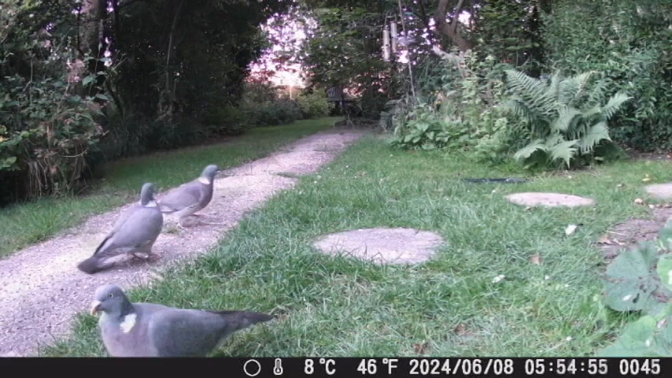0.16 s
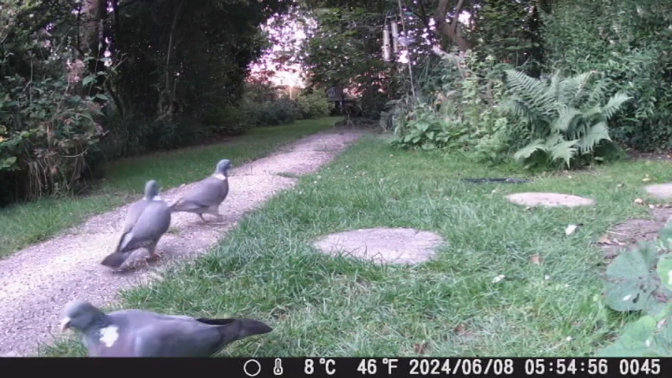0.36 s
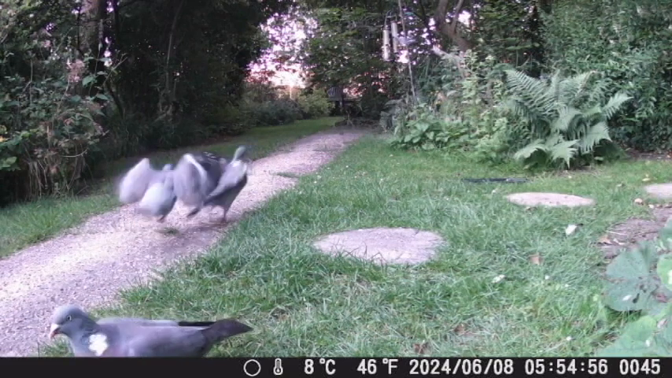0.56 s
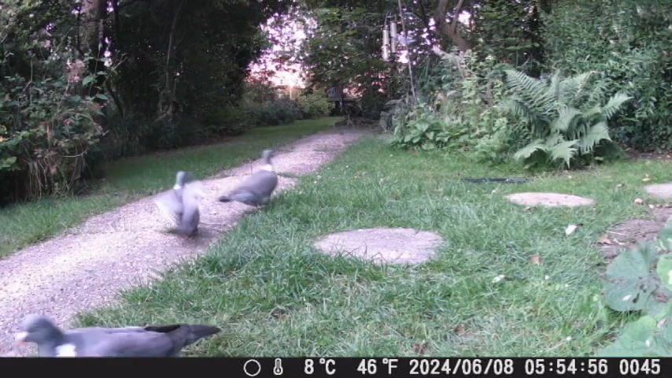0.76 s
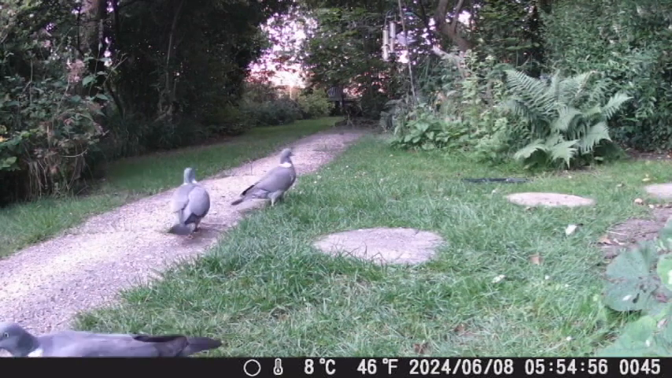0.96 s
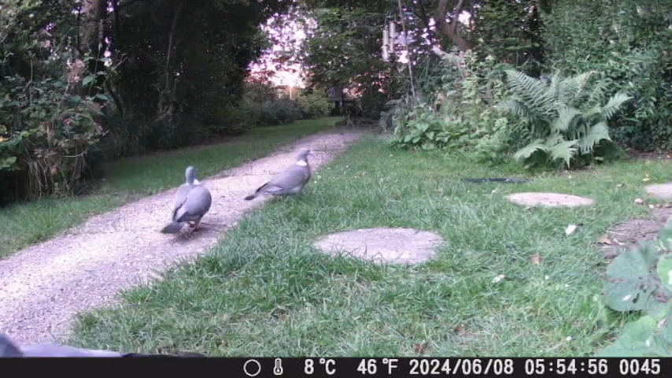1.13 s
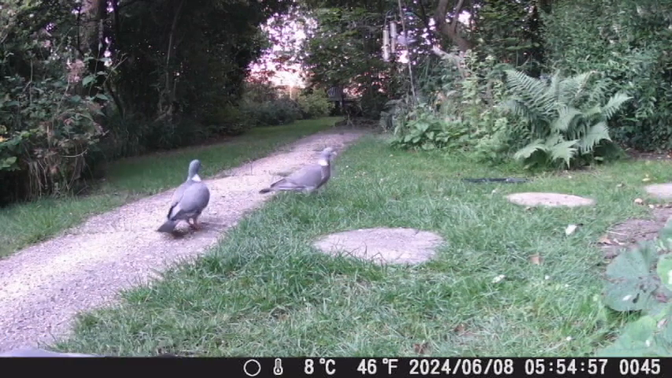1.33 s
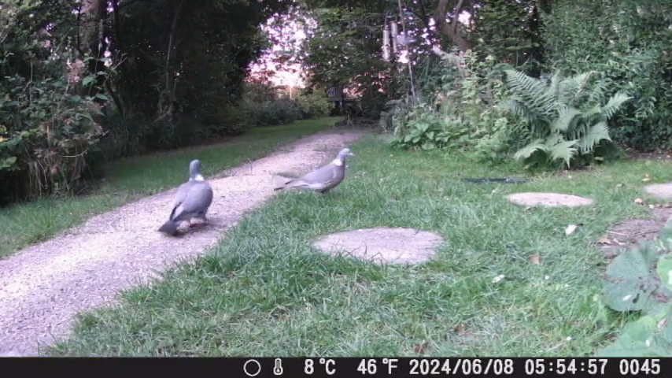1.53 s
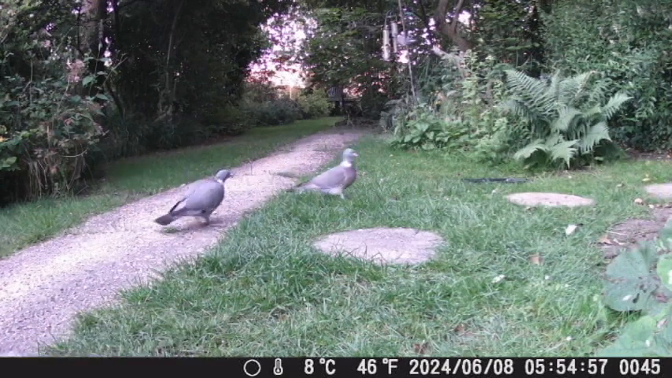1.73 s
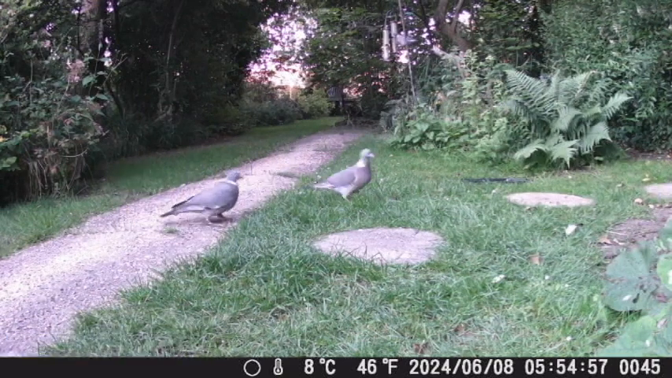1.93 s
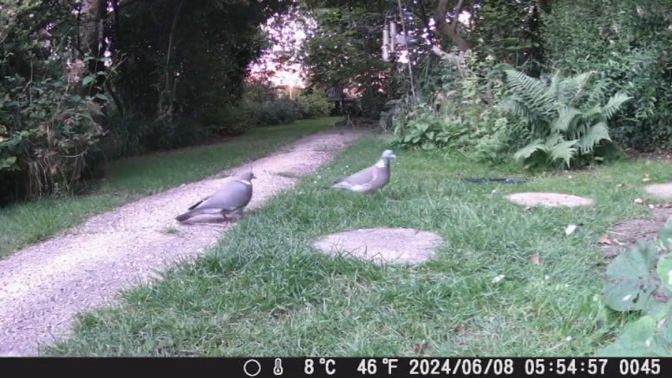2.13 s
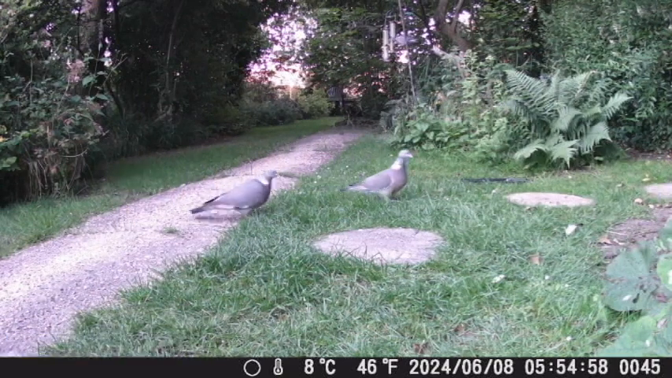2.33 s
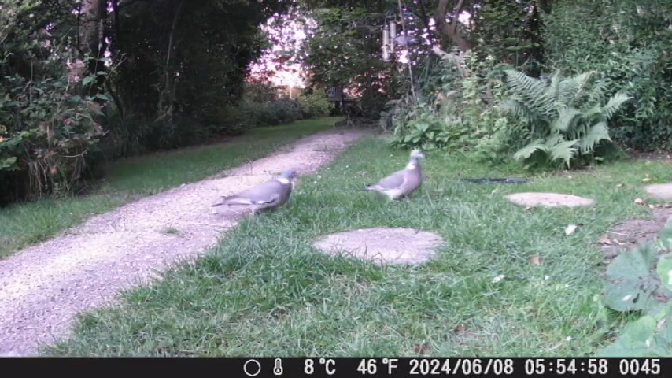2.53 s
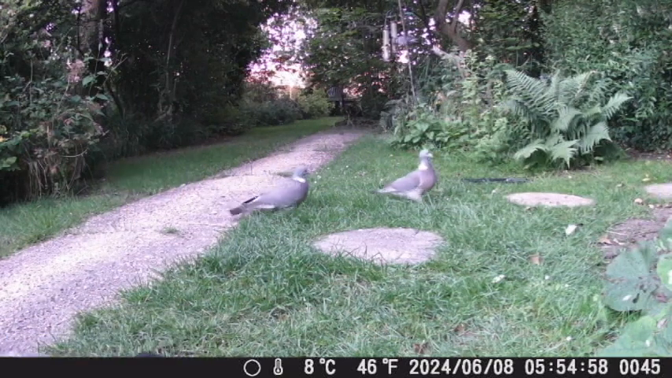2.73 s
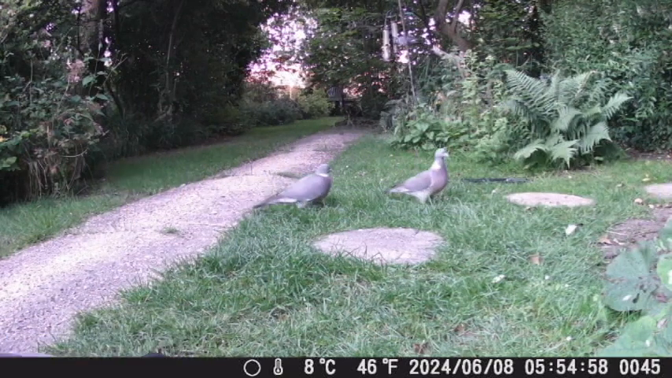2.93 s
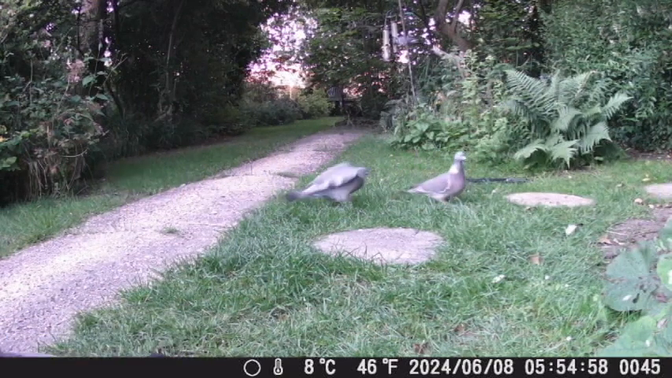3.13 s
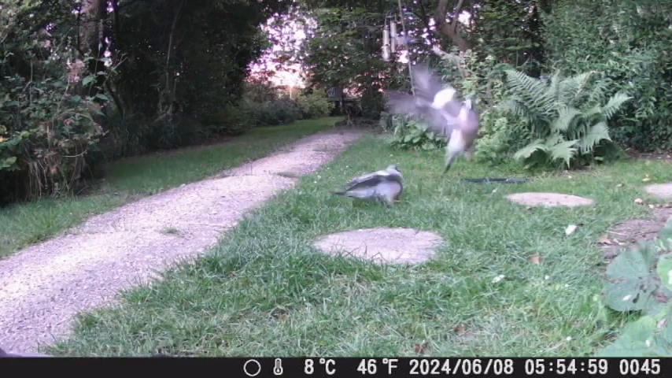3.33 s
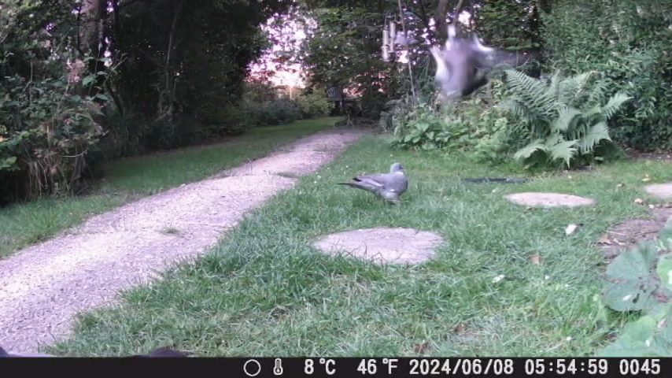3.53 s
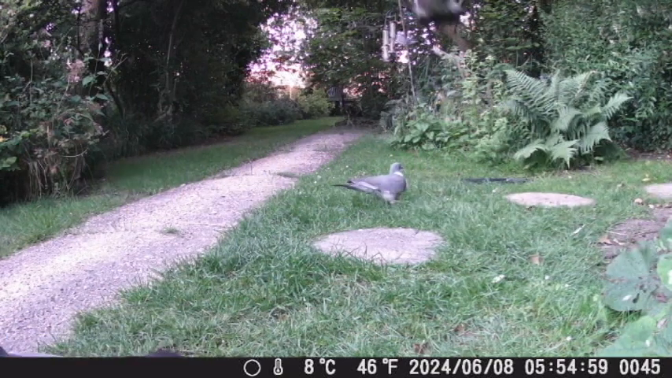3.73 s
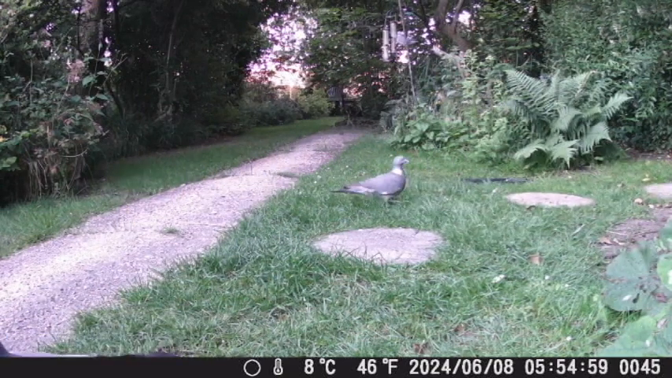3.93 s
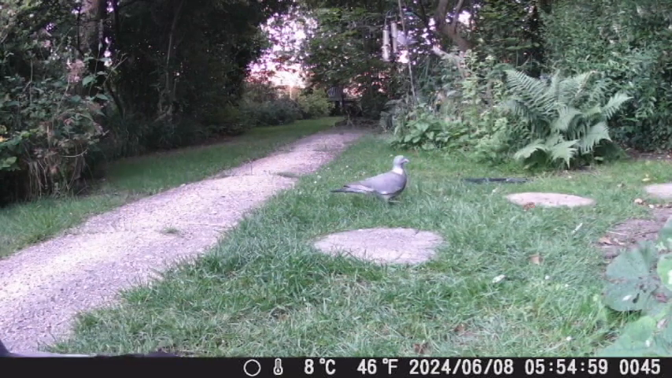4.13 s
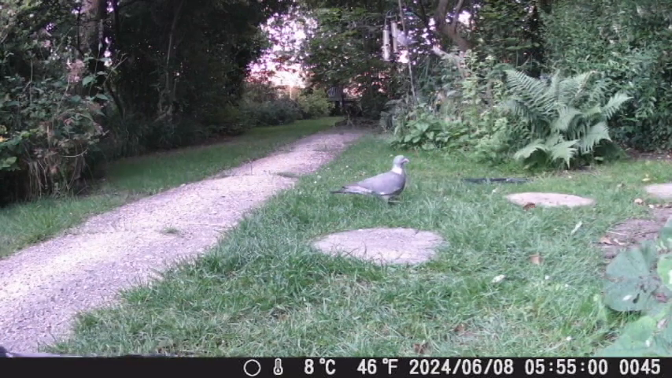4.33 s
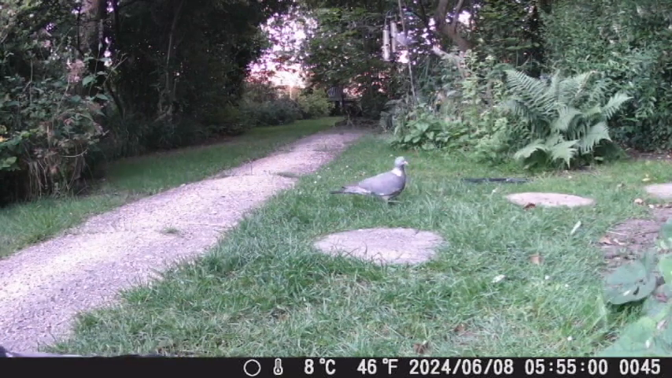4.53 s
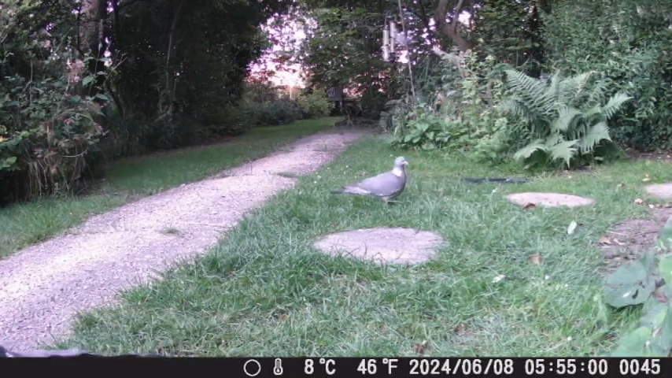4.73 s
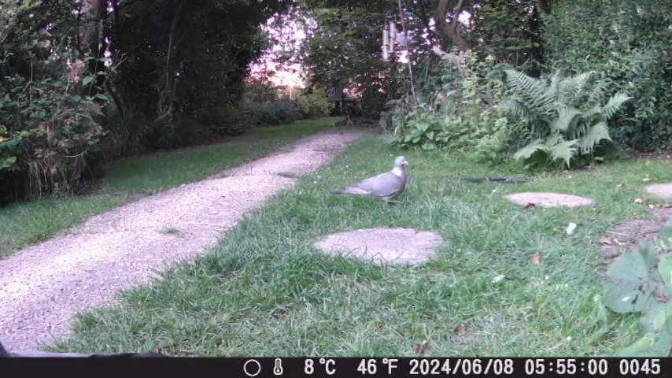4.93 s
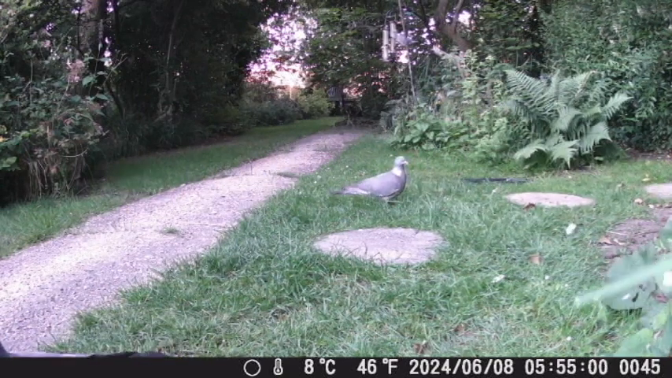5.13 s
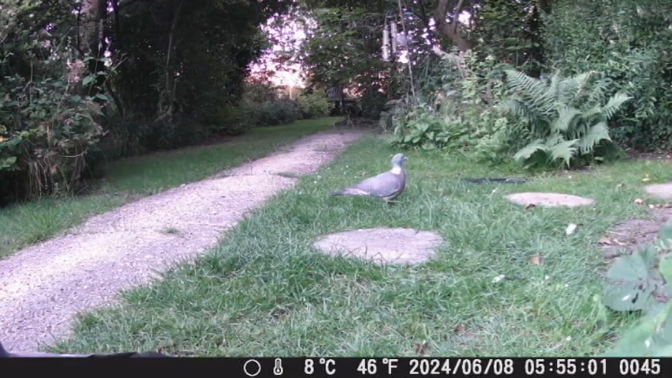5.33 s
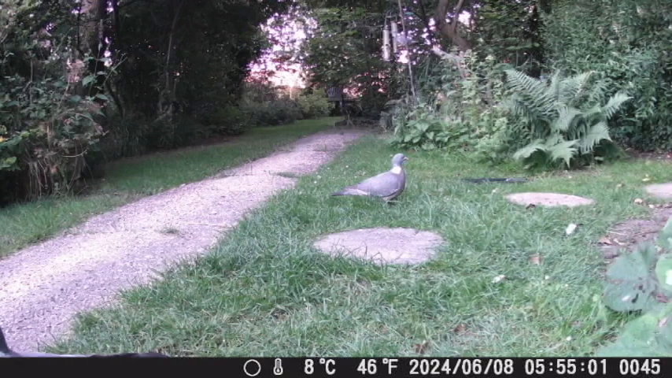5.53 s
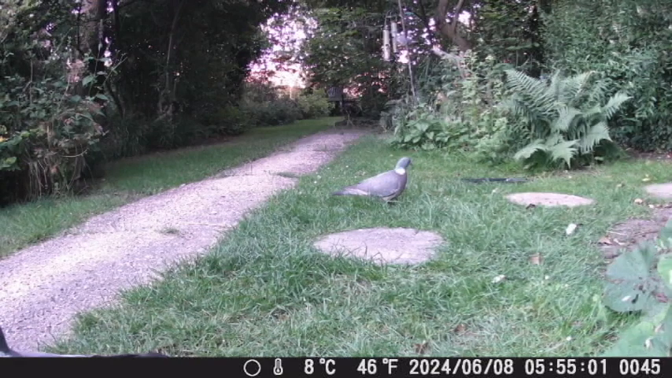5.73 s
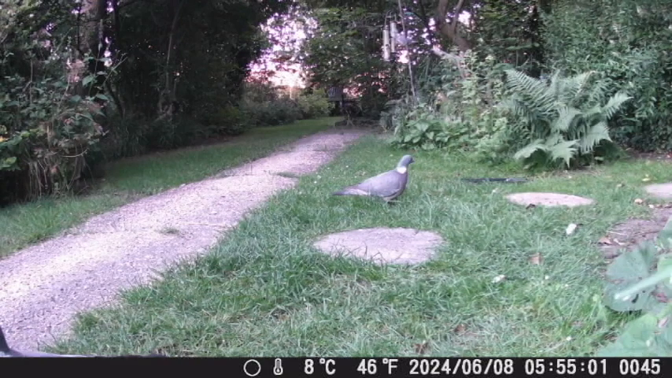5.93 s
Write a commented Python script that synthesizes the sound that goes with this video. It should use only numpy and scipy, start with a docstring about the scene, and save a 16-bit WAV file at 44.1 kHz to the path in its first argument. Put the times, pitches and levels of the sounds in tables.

```python
"""A garden at dawn, on one fixed microphone. Far doves coo over a quiet floor and feet tick in the grass.
Close by, a wood pigeon hops with a flick of its wings, and thin songbird notes follow from far off.
At 3.3 s the pigeon climbs away overhead: its wings clap above the back, swish and whistle down, and
send a low pressure dip at each turn. From 4.8 s the downwash buffets the microphone, while the last
wingbeats fade and a distant songbird repeats a falling call."""
import sys
import numpy as np
from scipy import signal
from scipy.fft import rfft, irfft, next_fast_len
from scipy.io import wavfile
from scipy.ndimage import uniform_filter1d, map_coordinates

SR = 44100
rng = np.random.default_rng(int(sys.argv[2]) if len(sys.argv) > 2 else 0)


def digitize_waveform(pressure):
    """Quantize a signal to 16-bit integers and store it at the path in sys.argv[1].

    Rows of a 2-D input are taken as channels; values are limited to [-1, 1].
    """
    field = np.atleast_2d(pressure).T
    bounded = np.clip(field, -1, 1)
    quanta = np.round(bounded * 32767).astype(np.int16)
    wavfile.write(sys.argv[1], SR, quanta)


N = 267775
T = np.arange(N) / SR


def amp(db):
    """Gain of a level in dB."""
    return 10 ** (np.asarray(db) / 20)


def unit(x):
    """Scaled to rms 1."""
    return x / np.sqrt(np.mean(x ** 2) + 1e-20)


def along(points, hz):
    """(Hz, value) points read on a log axis."""
    point_hz, values = np.transpose(points)
    return np.interp(np.log(hz + 1), np.log(point_hz + 1), values)


def filtered(x, response):
    """x times a response of frequency; the end is eased out so that it does not click."""
    x = np.concatenate([x, x[..., -1:] * np.hanning(4096)[2048:]], axis=-1)
    size = next_fast_len(N + SR // 2)
    return irfft(rfft(x, size) * response(np.fft.rfftfreq(size, 1 / SR)), size)[..., :N]


def noise(spectrum):
    """Coloured noise of rms 1."""
    return unit(filtered(rng.standard_normal(N), lambda hz: amp(along(spectrum, hz))))


def narrow_noise(width_hz):
    """Slow complex noise; on a carrier it makes a breathy band."""
    real, imag = filtered(rng.standard_normal((2, N)), lambda f: 1 / (1 + (f / width_hz) ** 2))
    return unit(real) + 1j * unit(imag)


def wobble(rate):
    """A smooth random curve, rate knots a second."""
    return map_coordinates(rng.standard_normal(int(N * rate / SR) + 4), [T * rate])


def whistles(notes, breath, width_hz):
    """Short gliding tones with rounded ends; held notes are clearer, glides breathier."""
    out, air = np.zeros(N), narrow_noise(width_hz)
    for start, length, from_hz, to_hz, db in notes:
        span = slice(round(start * SR), round((start + length) * SR))
        progress = (T[span] - start) / length
        phase = 2 * np.pi * np.cumsum(from_hz + (to_hz - from_hz) * progress) / SR
        share = breath * min(1, .25 + abs(to_hz - from_hz) / 60)
        voice = np.sqrt(2) * (1 - share) + share * air[span]
        envelope = amp(db) * np.abs(np.sin(np.pi * progress)) ** .5
        out[span] += envelope * np.real(voice * np.exp(1j * phase))
    return out


def bursts(starts, levels_db, t60_s, attack_s):
    """An envelope that rises fast at each start and dies away."""
    out, age = np.zeros(N + SR), T[:SR // 4]
    rise = 1 - np.exp(-age / attack_s)
    for start, db in zip(starts, levels_db):
        out[round(start * SR):][:len(age)] += amp(db - 60 * age / t60_s) * rise
    return out[:N]


def bumps(rows, before=0, after=0, pointed=0):
    """Pressure bumps, round or pointed by a share, with optional opposite lobes before and after."""
    out = np.zeros(N)
    for centre, db, width_ms, push in rows:
        span = slice(round((centre - .2) * SR), round((centre + .2) * SR))
        u = (T[span] - centre) / (width_ms / 1000)
        peak = (1 - pointed) * np.exp(-2.8 * u ** 2) + pointed / np.cosh(np.clip(2.88 * u, -50, 50))
        lobes = before * np.exp(-2.2 * (u + 1.8) ** 2) + after * np.exp(-2.2 * (u - 1.2) ** 2)
        out[span] += push * amp(db) * (peak - lobes)
    return out


# Spectrum of the quiet garden: frequency_hz, density_db
DAWN_SPECTRUM = [(12, -9), (40, -2), (65, -8.5), (120, -13), (250, -20), (500, -24), (1000, -26.5),
                 (2000, -30), (2600, -35.5), (3300, -41), (4100, -48), (5000, -52.5), (6500, -46),
                 (8000, -46.5)]


def dawn_floor():
    """Far traffic, leaves and the microphone's own hiss, slowly uneven."""
    return amp(-68.5 + 0.24 * wobble(3.3)) * noise(DAWN_SPECTRUM)


# Coos in the distance: start_s, crest_s, end_s, start_hz, crest_hz, end_hz, level_db
DOVE_COOS = [(-.05, 0.104, 0.242, 564, 598, 569, -70.5), (0.214, 0.252, 0.31, 480, 460, 440, -72),
             (.61, .68, .87, 430, 500, 488, -76), (.99, 1.35, 1.62, 520, 572, 415, -73),
             (1.582, 1.7, 2.1, 303, 309, 295, -70), (1.87, 2.05, 2.14, 440, 620, 605, -75),
             (2.583, 2.65, 2.9, 305, 303, 287, -67), (2.88, 3.018, 3.28, 580, 588, 564, -76)]


def doves(throat_hz=470, loss_db_per_hz=0.0893, hoarse=.25, fade_s=.03):
    """Far doves: soft, hoarse glides that weaken away from the throat's own pitch."""
    out = np.zeros(N)
    breath = 1 - hoarse + hoarse * narrow_noise(width_hz=34).real
    for start, crest, end, from_hz, crest_hz, to_hz, db in DOVE_COOS:
        bend = np.sin(np.pi / 2 * np.interp(T, [start, crest, end], [-1, 0, 1])) ** 2
        hz = crest_hz - bend * np.where(T < crest, crest_hz - from_hz, crest_hz - to_hz)
        fade_db = np.interp(T, [start, start + fade_s, end - fade_s, end], [-16, 0, 0, -16], -150, -150)
        level = amp(db - loss_db_per_hz * np.abs(hz - throat_hz) + fade_db + 1.6 * wobble(17))
        phase = 2 * np.pi * np.cumsum(hz * (1 + .012 * wobble(150))) / SR
        out += np.sqrt(2) * breath * level * np.sin(phase)
    return out


# Feet and beaks in the grass: start_s, level_db
GRASS_TICKS = [(0.234, -63), (0.4464, -75), (0.5337, -65), (0.5546, -61), (0.7613, -64), (0.7871, -69.5),
               (0.8116, -69), (1.8223, -71.5), (2.1745, -81), (2.7342, -76)]


def grass():
    """Blades tick dryly at ground level, over a faint uneven rustle."""
    starts, db = np.transpose(GRASS_TICKS)
    blades = noise([(1500, -27.5), (3000, -34.0), (5200, -30), (6500, -1.5), (8000, -3.5)])
    ticks = bursts(starts, db - 0.5, t60_s=0.041, attack_s=0.00078)
    rustle = amp(-92.5 + 1.8 * wobble(7.2) + 3.7 * wobble(90))
    return (ticks + rustle) * blades


# Wings flicked on the ground: peak_s, level_db, rise_s, fall_s, whoop_relative_db, whoop_hz
GROUND_SHUFFLES = [(0.561, -70.5, 0.057, 0.021, -10, 503), (0.771, -80, 0.034, 0.06, -12, 506),
                   (3.274, -75.5, 0.022, 0.037, 6.5, 305)]
# The long rush of the climb, one row with the same columns
CLIMB_RUSH = (4, -78, 0.4, 0.76, -37, 594)
# Downstrokes overhead: peak_s, level_db, whoop_relative_db, whoop_hz, turn_s, dip_db, dip_ms, sag_db
WING_DOWNSTROKES = [(3.33, -62.5, -5, 700, 3.366, -44, 21, -42), (3.46, -68, -8, 600, 3.499, -42, 13, -51),
                    (3.585, -65.5, -0.5, 940, 3.63, -40.5, 10.4, -36.5),
                    (3.72, -67.5, -17, 590, 3.731, -31, 10.5, -48),
                    (3.855, -66, -5, 662, 3.858, -27.5, 11.5, -55),
                    (3.98, -60, -11, 576, 3.985, -22.5, 13, -48),
                    (4.1, -60.5, -2, 636, 4.107, -18, 15.3, -41),
                    (4.225, -63, 4, 610, 4.233, -22, 13.3, -32.5),
                    (4.35, -68, 8, 602, 4.363, -27.5, 16.3, -47),
                    (4.475, -70.5, 5.5, 608, 4.493, -32.5, 18.5, -41.5),
                    (4.61, -71.5, 0.5, 575, 4.626, -38, 18, -43.5),
                    (4.74, -74.5, 5.5, 689, 4.76, -39.5, 14, -42.5)]
# Upstrokes that reach the microphone: peak_s, level_db, whoop_relative_db, whoop_hz
WING_UPSTROKES = [(3.385, -68.5, 3, 504), (3.511, -74.5, -7, 500), (3.64, -70.5, -9, 594),
                  (3.765, -72, 6.5, 712), (4.012, -69, 8, 378), (4.139, -71, 11.5, 410),
                  (4.265, -78.5, 6, 780), (4.3, -72.5, 5, 385)]


def wing_strokes(down_rise_s=0.029, up_rise_s=.008, up_fall_s=0.0098):
    """Every stroke from the hop to the last far beat, in the columns of GROUND_SHUFFLES."""
    strokes = list(GROUND_SHUFFLES) + [CLIMB_RUSH]
    for peak, db, whoop_db, hz, _, dip_db, _, _ in WING_DOWNSTROKES:
        fall_s = 0.008 + .0012 * min(abs(-20.5 - dip_db), 14)  # a hard turn stops the swish sooner
        strokes.append((peak, db, down_rise_s, fall_s, whoop_db, hz))
    for peak, db, whoop_db, hz in WING_UPSTROKES:
        strokes.append((peak, db, up_rise_s, up_fall_s, whoop_db, hz))
    for beat in range(5):  # far off, ever slower and fainter
        peak = 4.875 + 0.14 * beat + 0.0033 * beat ** 2
        strokes.append((peak, -75.5 - 1.1 * beat, down_rise_s, 0.026, -4, 623))
    return strokes


# Feather noise through the microphone's housing: frequency_hz, density_db
FEATHER_SPECTRUM = [(60, -15), (130, 1), (300, -6), (800, -2.5), (1150, -5.5), (1650, -8), (2600, -13),
                    (3200, -15.5), (4000, -23.5), (4900, -34), (5800, -27), (6800, -18), (8000, -23)]


def wing_swishes():
    """Air tears over the feathers; each stroke also whoops in a low band that sinks as the wing slows."""
    swish_level, whoop = np.zeros(N), np.zeros(N)
    air = 0.85 + 0.71 * narrow_noise(width_hz=60)
    for peak, db, rise, fall, whoop_db, hz in wing_strokes():
        age = T - peak
        envelope = amp(db) * np.exp(-(age / np.where(age < 0, rise, fall)) ** 2)
        swish_level += envelope
        sink = 5.2 * np.clip(1 - (peak - 4.3) / .2, .2, 1)  # the glide flattens as the bird levels out
        glide_s = np.clip(age, -.06, .06)
        phase = 2 * np.pi * hz * (age - sink * glide_s * (2 * age - glide_s))
        late = np.roll(envelope, 300)  # the whoop peaks near the end of the stroke
        whoop += amp(whoop_db) * late * np.real(air * np.exp(1j * phase))
    rustle = amp(2.3 * wobble(120) + 0.99 * wobble(500))  # single feathers slip and flick
    feathers = unit(rustle * noise(FEATHER_SPECTRUM))
    treble = filtered(feathers, lambda f: f > 3300)
    facing_db = 4.5 * np.exp(-((T - 3.8) / .45) ** 2)  # the wings face the microphone
    leaving_db = -5.4 * np.clip(T - 4.2, 0, 1.5)  # the bird turns away and climbs
    feathers += (amp(facing_db + leaving_db) - 1) * treble
    return 1.343 * swish_level * feathers + 1.4 * whoop


# Air right on the microphone's port: centre_s, level_db, width_ms, push_gain (negative pulls)
PORT_THUDS = [(.54, -43.5, 13, 0.94), (.565, -40, 21, -0.9), (.592, -48.5, 12, 0.96), (3.297, -41, 5.7, -1),
              (3.345, -41, 12, 1), (3.475, -39.5, 7.8, 1), (4.179, -34, 7.2, 1), (4.8417, -21.5, 1.7, 1),
              (4.8455, -21.5, 3.3, -0.99), (4.861, -19, 1.53, -0.86), (4.88, -36.5, 52, -1),
              (4.9, -28, 1.9, -1.1), (4.911, -21.5, 3.8, 0.96), (4.922, -25.5, 3.4, 0.98),
              (4.933, -18.5, 41, 0.99), (4.94, -20.5, 6, 0.94), (4.946, -24, 2.6, -0.93),
              (4.9505, -19, 2.5, -1), (4.956, -23.5, 2.6, 1), (4.982, -27, 7.1, -1),
              (5.005, -29, 2.5, -1.16), (5.069, -30, 3.7, -1.04), (5.46, -30, 9.6, -0.9),
              (5.553, -31, 5.9, -1.02), (5.702, -30, 7.8, -1), (5.75, -33.5, 9.4, -0.78),
              (5.762, -30, 5.1, 0.94), (5.861, -33, 6.5, 0.91), (5.96, -30.5, 14.4, 1)]


def port_thuds():
    """Single strong pushes and pulls of air land as pointed thuds."""
    return bumps(PORT_THUDS, before=0.046, after=0.071, pointed=0.88)


# Top of each beat, where the wings meet and turn: start_s, clap_db, pop_relative_db, dip_db, dip_ms
WING_TOPS = [(0.557, -56, -14, -54, 6), (3.2877, -57.5, 4, -48, 8.4), (3.4156, -51.5, -9, -43, 9.3),
             (3.5431, -49, -4.5, -39, 7.8), (3.6698, -51, -11.5, -40.5, 6.5),
             (3.7928, -41.5, -21, -38.5, 4.8), (3.9202, -40.5, -15, -35.5, 6),
             (4.045, -41.5, -19.5, -31.5, 9.1), (4.167, -55, 6.5, -31.5, 17),
             (4.2922, -56.5, -7, -32.5, 11), (4.427, -58.5, -9, -34.5, 7.6), (4.552, -68, -7.5, -37.5, 7.3),
             (4.688, -73.5, -8.5, -42, 7)]


def wing_claps():
    """The wings meet above the back: a crack and a hollow pop."""
    starts, db, pop_db, *_ = np.transpose(WING_TOPS)
    crack = bursts(starts, db - 6.5, t60_s=0.04, attack_s=0.0011) * noise(FEATHER_SPECTRUM)
    hollow = noise([(100, -21.0), (200, 4.5), (1000, -3.5), (2000, -28.5)])
    pop = bursts(starts, db + pop_db - 5.0, t60_s=0.06, attack_s=0.00039) * hollow
    return crack + pop


def wing_dips(wake_lag_s=0.03, wake_db=-42.5, wake_ms=16, sag_lead_s=.028):
    """At close range the pressure dips at each turn of the wing, sags in mid-stroke and dips after it."""
    takeoff_s = WING_TOPS[1][0]
    dips = [(start, db, ms, -1) for start, _, _, db, ms in WING_TOPS]
    sags = []
    for *_, turn, dip_db, dip_ms, sag_db in WING_DOWNSTROKES:
        dips += [(turn, dip_db, dip_ms, -1), (turn + wake_lag_s, wake_db, wake_ms, -1)]
        sag_ms = 6.9 + 14 * (turn - takeoff_s)  # broader as the bird climbs
        sags.append((turn - sag_lead_s, sag_db, sag_ms, -1))
    return bumps(dips, before=0.02, after=0.032) + bumps(sags)


# Distant song before the take-off: start_s, length_s, start_hz, end_hz, level_db
SONG_NOTES = [(.88, 0.049, 2580, 2537, -85), (1.11, 0.065, 3690, 3600, -91), (1.23, 0.045, 3000, 2540, -86),
              (1.28, 0.032, 2500, 2540, -84), (1.33, .07, 3760, 3730, -90), (1.37, 0.026, 3400, 3240, -88),
              (1.45, .023, 3620, 3510, -91), (1.66, .046, 2580, 2510, -84.5),
              (1.74, 0.076, 3810, 3840, -95), (1.8, .1, 3950, 4100, -97), (1.87, .13, 7250, 6820, -87.5),
              (1.91, .07, 7070, 6870, -91), (1.92, .07, 6650, 6450, -89), (1.95, .05, 6400, 5600, -92),
              (2.03, 0.064, 2420, 2690, -84), (2.035, 0.082, 3724, 3720, -86.5),
              (2.185, .065, 7950, 7050, -83), (2.25, 0.079, 7230, 7400, -88.5),
              (2.22, 0.098, 3710, 3710, -95), (2.23, 0.07, 6500, 6750, -83.5),
              (2.34, .035, 4960, 4450, -97), (2.37, .06, 6100, 5800, -97), (2.4, .04, 5100, 4850, -96),
              (2.39, .078, 2480, 2610, -90.5), (2.43, 0.084, 4020, 3990, -94),
              (2.44, 0.059, 3300, 3200, -91), (2.48, .03, 3600, 3550, -90), (2.51, 0.043, 3080, 2920, -81),
              (2.57, 0.029, 2810, 2580, -80)]
# A falling call repeated after it: start_s, start_hz, level_db
SEEP_CALLS = [(5.16, 6740, -95), (5.3, 6360, -93.5), (5.43, 6380, -98), (5.52, 6640, -94),
              (5.57, 6350, -96), (5.72, 6570, -97), (5.9, 6920, -94)]


def songbirds(seep_s=.045, seep_drop_hz=190):
    """Songbirds whistle thin, breathy notes far from the microphone."""
    seeps = [(start, seep_s, hz, hz - seep_drop_hz, db) for start, hz, db in SEEP_CALLS]
    return whistles(SONG_NOTES + seeps, breath=0.94, width_hz=90)


# Flight feathers sounding overhead: start_s, length_s, start_hz, end_hz, level_db
FEATHER_NOTES = [(3.305, 0.041, 2710, 3185, -71), (3.43, 0.049, 2500, 3200, -74.5),
                 (3.69, .03, 3600, 3900, -83), (3.811, 0.012, 3700, 3570, -75),
                 (3.833, 0.023, 3130, 3070, -67), (3.945, 0.03, 2910, 3040, -68.5),
                 (4.195, 0.028, 3000, 3170, -70), (4.32, 0.028, 2900, 2900, -74)]


def wing_whistles():
    """Air whistles briefly through the flight feathers during the climb."""
    return whistles(FEATHER_NOTES, breath=1.0, width_hz=120)


# Strength of the big eddies in two gusts on the microphone: time_s, level_db
DOWNWASH_GUSTS = [(4.816, -62.5), (4.84, -31), (4.89, -32.5), (4.94, -25.5), (5.04, -33), (5.11, -40.5),
                  (5.23, -47), (5.32, -59), (5.38, -56.5), (5.45, -38), (5.55, -38.5), (5.64, -39.5),
                  (5.781, -33), (5.84, -49), (5.88, -43), (6.07, -44)]


def downwash(small_at_strike_db=-14, settle_s=.3, spurt_db=6):
    """Eddies sweep the port in lumps; the more small ones the air carries, the brighter the rumble."""
    times, db = np.transpose(DOWNWASH_GUSTS)
    hz, frame_s, spectra = signal.stft(rng.standard_normal(N), SR, nperseg=1024, noverlap=896)
    # small eddies abound where the first gust strikes; later their share follows the air's strength
    fresh = np.exp(-(np.clip(frame_s - times[0], 0, None) / settle_s) ** 2)
    small_later_db = -27 + .6 * (np.interp(frame_s, times, db) + 31.5)
    small_db = fresh * small_at_strike_db + (1 - fresh) * small_later_db
    db_per_hz = np.clip((small_db + 6.5) / 170, -.3, -.045)
    tilt = (hz[:, None] + 14) ** -.4 * amp(db_per_hz * hz[:, None])
    tilt /= np.sqrt(np.mean(tilt ** 2, 0))
    eddies = signal.istft(spectra * tilt, SR, nperseg=1024, noverlap=896)[1][:N]
    # the strength of the gust bounds the size of the eddies
    evened = eddies / np.abs(uniform_filter1d(eddies ** 2, 2600)) ** .45
    level = uniform_filter1d(amp(np.interp(T, times, db, left=-120) - 2.0), 300)
    rumble = level * unit(evened)
    small = filtered(rumble, lambda f: f ** 2 / (f ** 2 + 150 ** 2))
    spurts = uniform_filter1d(unit(amp(5 * wobble(90))), 150)  # small eddies break loose
    return rumble + small * (amp(spurt_db) * spurts - 1)


# Decay of sound among the garden's hedges: frequency_hz, t60_s
HEDGE_DECAY = [(200, 0.85), (2000, 0.54), (8000, 0.9)]


def hedges(x, wet_db):
    """x with the scattered answer of the hedges, each frequency dying at its own speed."""
    hz, age, spectra = signal.stft(rng.standard_normal(SR // 2), SR, nperseg=256)
    decay = amp(-60 * age / along(HEDGE_DECAY, hz)[:, None])
    tail = signal.istft(spectra * decay, SR, nperseg=256)[1]
    delayed = np.pad(x, (300, 0))
    return x + amp(wet_db) * signal.fftconvolve(delayed, tail / np.linalg.norm(tail))[:N]


def scene():
    """The far garden and the near pigeon, all at the one microphone."""
    garden = dawn_floor() + hedges(doves(), wet_db=-11) + grass() + hedges(songbirds(), wet_db=-2.5)
    wings = hedges(wing_swishes() + wing_claps(), wet_db=-7.5) + wing_whistles()
    # the microphone's 3 Hz bass cut swings each bump back
    pressure = filtered(port_thuds() + wing_dips(), lambda f: 1j * f / (3 + 1j * f))
    return (garden + wings + pressure + downwash())[None]


# Filter of the converter behind the microphone: frequency_hz, gain_db
IMAGE_FILTER = [(7990, -6.5), (8500, -2.5), (9300, -11), (10000, -15)]


def record(dry, converter_hz=16000, top_hz=15800):
    """A slow converter leaves a mirror image above half its rate; a faint flat hiss lies under all."""
    base = filtered(dry, lambda f: f < converter_hz / 2)
    upper = filtered(base, lambda f: f > converter_hz / 3)
    image = 2 * upper * np.cos(2 * np.pi * converter_hz * T)
    rolloff = IMAGE_FILTER + [(10300, -86)]
    mirror = filtered(image, lambda f: amp(along(rolloff, f)) * (f > converter_hz / 2))
    hiss = amp(-98.5) * rng.standard_normal(dry.shape)
    return filtered(base + mirror + hiss, lambda f: f < top_hz)


dry = scene()
out = record(dry)
digitize_waveform(out)
```